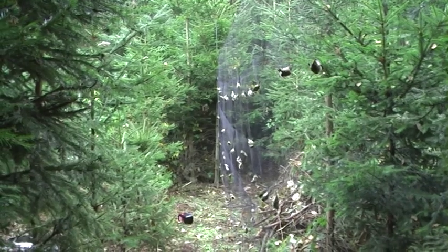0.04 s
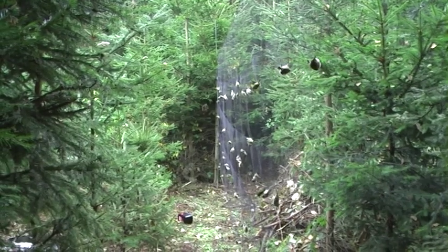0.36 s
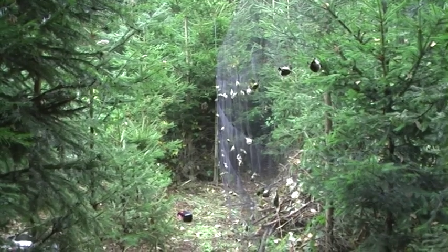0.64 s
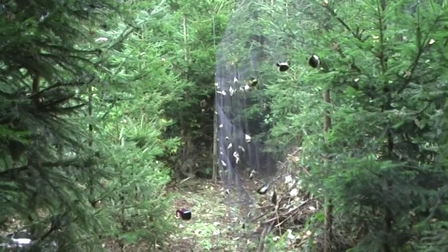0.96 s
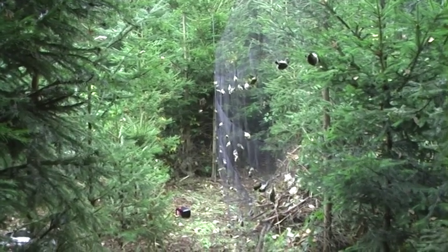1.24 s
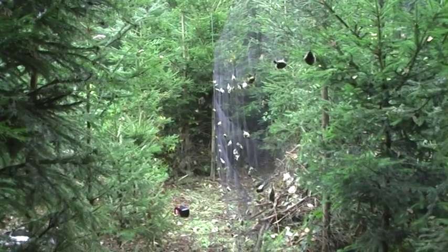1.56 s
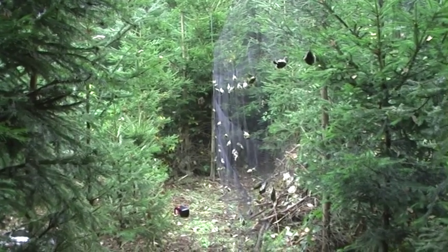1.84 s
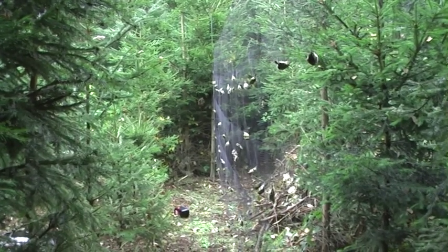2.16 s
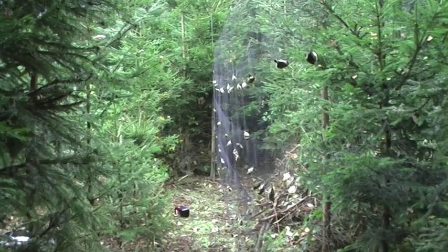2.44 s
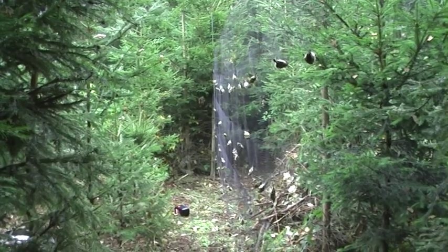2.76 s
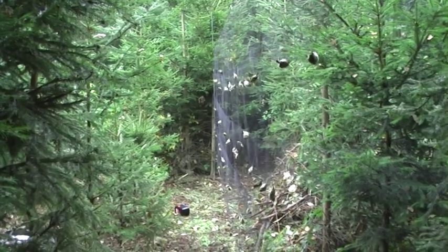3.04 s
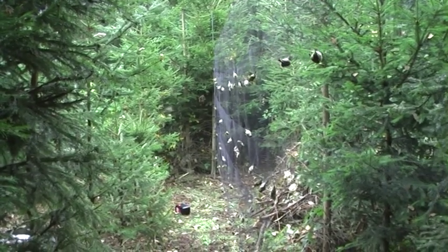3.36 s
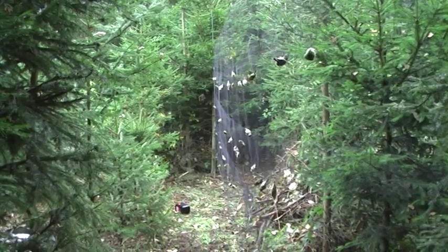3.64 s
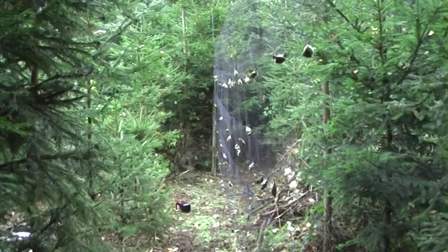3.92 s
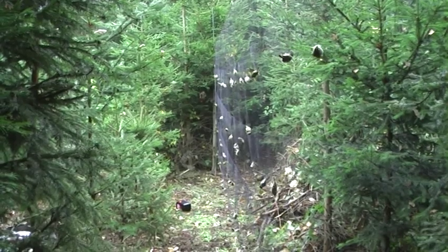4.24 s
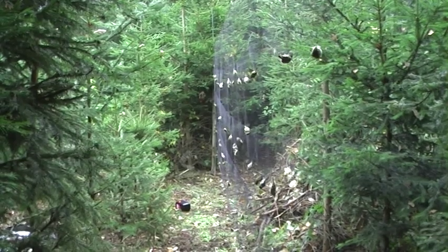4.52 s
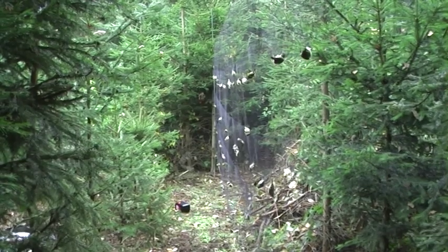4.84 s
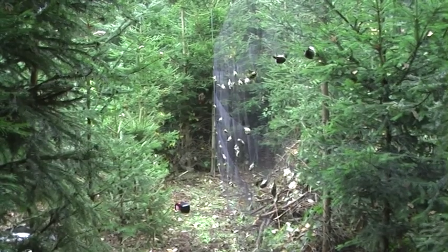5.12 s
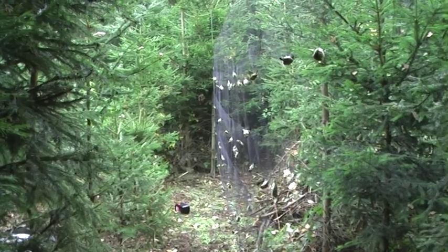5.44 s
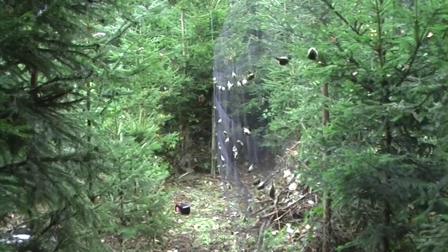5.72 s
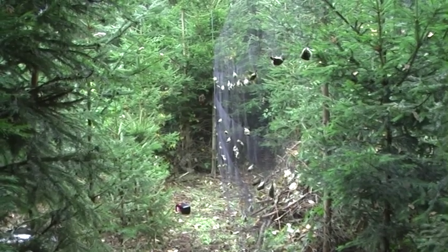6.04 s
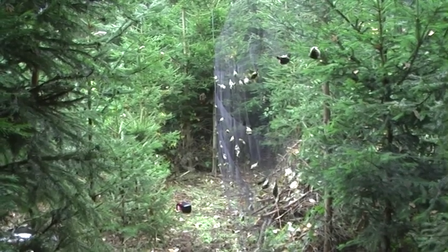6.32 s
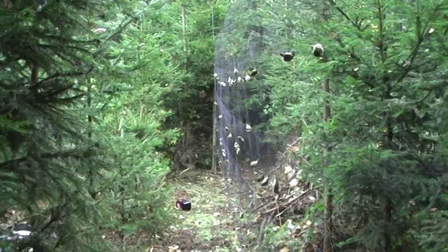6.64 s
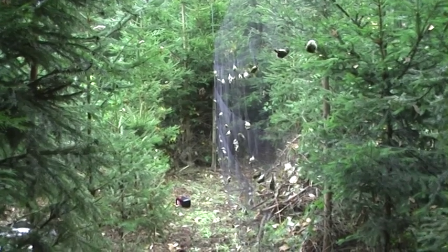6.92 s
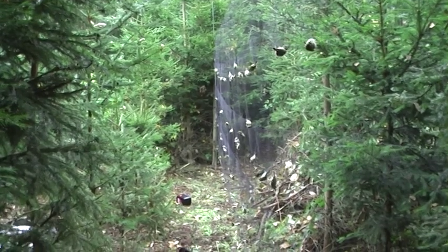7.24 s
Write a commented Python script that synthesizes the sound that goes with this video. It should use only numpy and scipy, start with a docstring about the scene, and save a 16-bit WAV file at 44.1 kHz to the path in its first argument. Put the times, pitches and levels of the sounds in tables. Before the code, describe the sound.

Thin, high-pitched birdsong comes twice, each phrase ending in a flourish, with soft treetop wind and faint twig ticks behind it.

```python
"""In a spruce wood a goldcrest sings two thin, cycling phrases, each ending in a flourish.
Its syrinx makes nearly pure tones, its throat and windpipe filter them, and trunks scatter every note.
Between the phrases come soft notes, contact calls and the blurred twitter of birds deeper in the wood.
Wind sighs in the treetops as bands of noise, a far engine drones at its firing frequency,
and needles, twigs and dry litter rustle and tick."""
import sys
import numpy as np
from scipy import signal
from scipy.fft import rfft, irfft
from scipy.io import wavfile

SR = 44100
rng = np.random.default_rng(int(sys.argv[2]) if len(sys.argv) > 2 else 0)


def waveform_to_disk(signal):
    """Save audio, clipped to [-1, 1], as 16-bit WAV at the path in sys.argv[1]."""
    frames = np.transpose(np.atleast_2d(signal))
    scaled = np.clip(frames, -1, 1) * 32767
    samples = np.round(scaled).astype(np.int16)
    wavfile.write(sys.argv[1], SR, samples)


N = 329868
TIME = np.arange(N) / SR
# Contour of a short call. Each row: share of its length, pitch offset in Hz, level in dB.
CALL_SHAPE = [(0.0, -130, -5), (0.25, -20, -1), (0.6, -54.5, -3), (1.0, -250, -3)]


def amp(db):
    """Decibels to amplitude ratio."""
    return 10 ** (np.asarray(db) / 20)


def unit(x):
    """Normalisation to rms 1."""
    return x / np.sqrt(np.mean(x ** 2) + 1e-20)


def follow(rows, at):
    """Linear interpolation of each column against the first."""
    knots, *columns = np.transpose(rows)
    return [np.interp(at, knots, column) for column in columns]


def on_log(points, hz):
    """Interpolation of a spectrum on a log-frequency axis."""
    knots_hz, value = np.transpose(points)
    return np.interp(np.log(hz + 1), np.log(knots_hz + 1), value)


def wander(n, rate_hz):
    """Random fluctuation: low-passed noise of rms about 1."""
    size = max(n, SR)
    low_pass = np.exp(-(np.fft.rfftfreq(size, 1 / SR) / rate_hz) ** 2)
    return unit(irfft(rfft(rng.standard_normal(size)) * low_pass, size))[:n]


def noise(colour):
    """Coloured stereo noise of rms 1, partly coherent between the channels."""
    # Each row: frequency in Hz, correlation of left and right.
    coherence = [(60, 0.69), (200, 0.9), (700, 0.89), (1500, 0.84), (3000, 0.5), (12000, 0.8)]
    hz = np.fft.rfftfreq(N, 1 / SR)
    left, independent = rfft(rng.standard_normal((2, N)))
    same = np.clip(on_log(coherence, hz), 0, 1)
    right = same * left + np.sqrt(1 - same ** 2) * independent
    return unit(irfft(np.array([left, right]) * amp(on_log(colour, hz)), N))


def add(mix, s, sound):
    """Superposition of a sound on the mix at time s."""
    start = round(s * SR)
    sound = sound[max(-start, 0):]
    part = mix[max(start, 0):][:len(sound)]
    part += sound[:len(part)]


def hump(s, length):
    """A half-sine envelope."""
    return np.sin(np.pi * np.clip((TIME - s) / length, 0, 1))


def syrinx(hz, db, buzz=0., buzz_hz=1000, waver_hz=25, hiss_db=-38):
    """A nearly pure whistle; amplitude modulation adds a skirt of air noise and a buzz's sidebands."""
    n = len(hz)
    t = np.arange(n) / SR
    phase = 2 * np.pi * np.cumsum(hz + waver_hz * wander(n, 270)) / SR
    edges = np.sin(np.pi / 2 * np.clip(np.minimum(t, t[-1] - t) / .002, 0, 1)) ** 2
    modulation = 1 + buzz * np.sin(2 * np.pi * buzz_hz * t) + amp(hiss_db) * wander(n, 1300)
    octave = amp(np.minimum(-63 + .0046 * (6900 - hz), 0))  # the throat passes more for low notes
    flutter_db = 1.4 * wander(n, rate_hz=90)
    return edges * modulation * amp(db + flutter_db) * (np.sin(phase) + octave * np.sin(2 * phase))


def note(shape, length, hz, db, glide_hz=0., swell_db=0., **voice):
    """Frequency modulation along one contour, stretched, shifted and tilted."""
    along = np.linspace(0, 1, round(length * SR))
    bend_hz, shape_db = follow(shape, along)
    tilt = along - .5
    return syrinx(hz + bend_hz + glide_hz * tilt, db + shape_db + swell_db * tilt, **voice)


def notes(shape, rows, **voice):
    """Superposition of notes that share a contour."""
    out = np.zeros(N)
    for s, *row in rows:
        add(out, s, note(shape, *row, **voice))
    return out


def song():
    """Four pitch contours cycle about twice a second; soft pips fall between the phrases."""
    # Each row: share of the note's length, pitch offset in Hz, level in dB.
    slur = [(0.0, -600, -15), (0.17, -170, -4.5), (0.35, -52, -2.5), (0.7, 13, 2.5), (0.87, 192.5, 1.5),
            (1.0, 239, -11.5)]
    arch = [(0, -380, -15), (.17, -140, -10), (.35, -10, -4), (.54, 0, -2), (.7, -70, -4), (.84, -230, -.5),
            (.96, -330, -2), (1, -650, -14)]
    chevron = [(0, -1150, -19), (.16, -950, -10), (.31, -110, -1), (.4, 0, 0), (.56, -650, -1),
               (.72, -950, -6), (1, -1080, -20)]
    pip = [(0.0, -260, -13.5), (0.25, -100, -8.5), (0.55, -32, -0.5), (0.85, -94, -4), (1.0, -500, -14.5)]
    # Each row: start and length in seconds, pitch in Hz, relative level in dB;
    # slurs add glide in Hz and swell in dB.
    slurs = [(0.102, 0.1, 6402, -21, -230, -1.5), (1.226, 0.034, 7150, -23.5, 250, -12),
             (4.497, 0.061, 6730, -43.5, -200, 6), (4.553, 0.065, 8470, -44, -200, -19),
             (4.949, 0.083, 6580, -30, -210, 14), (5.449, 0.094, 6415, -23, -200, -0.5),
             (5.959, 0.12, 6060, -22.5, -58, 5.5), (6.523, 0.1, 5943, -23.5, -170, 1),
             (7.185, 0.037, 7020, -28, 151, -11)]
    arches = [(0.256, 0.16, 7360, -23.5), (0.778, 0.17, 7195, -21.5), (1.013, 0.078, 7390, -19.5),
              (4.642, 0.11, 7410, -39), (5.081, 0.16, 7370, -30), (5.599, 0.138, 7353, -25.5),
              (6.119, 0.17, 7310, -25), (6.668, 0.17, 7280, -32)]
    chevrons = [(0.446, 0.055, 6500, -20), (4.789, 0.052, 6820, -30.5), (5.265, 0.048, 6570, -24.5),
                (5.775, 0.059, 6410, -22.5), (6.323, 0.046, 6485, -17)]
    pips = [(0.0, 0.059, 7140, -20.5), (0.529, 0.059, 7080, -21.5), (1.666, 0.087, 7170, -55.5),
            (1.91, 0.069, 7000, -57.5), (2.022, 0.071, 6950, -57), (2.263, 0.1, 7600, -49.5),
            (2.451, 0.109, 7430, -56), (4.87, 0.018, 7210, -27.5), (5.345, 0.063, 7150, -28.5),
            (5.861, 0.059, 7080, -27.5), (6.409, 0.063, 6900, -26)]
    return notes(slur, slurs) + notes(arch, arches) + notes(chevron, chevrons) + notes(pip, pips)


def wood(x, near_db=-13, near_t60=.24, far_db=-22.3, far_t60=.72):
    """Reverberation: a trunk reflects, near branches scatter densely, far trees leave a longer tail."""
    # Each row: delay in seconds, level in dB.
    trunk_echoes = [(.0088, -9.5)]
    t = np.arange(SR) / SR
    common, left, right = rng.standard_normal((3, SR)) * (t > .005)
    scatter = common + .8 * np.array([left, right])
    near = scatter * amp(-60 * t / near_t60)
    far = scatter[:, ::-1] * amp(-60 * t / far_t60) * (t > .01)
    response = amp(near_db) * near / np.linalg.norm(near[0]) + amp(far_db) * far / np.linalg.norm(far[0])
    response[:, 0] += 1  # direct sound
    for delay, db in trunk_echoes:
        response[:, round(delay * SR)] += amp(db)
    return signal.fftconvolve(x[None], response, axes=1)[:, :N]


def flock(flicker_db=3.5, fade_s=.18):
    """Scattering blurs far twitter into a flickering band of noise."""
    # Each row: frequency in Hz, spectral level in dB.
    band = [(5000, -46.5), (6000, -18), (7200, -14), (7700, -7), (8400, 0), (8800, -9), (9500, -30)]
    # Each row: start and length in seconds, level in dB.
    bouts = [(-0.3, 2.4, -65.5), (2.25, 1.25, -63.5), (4.3, 3.5, -63.5)]
    envelope = sum(amp(db) * np.clip(np.minimum(TIME - s, s + length - TIME) / fade_s, 0, 1)
                   for s, length, db in bouts)
    return noise(band) * envelope * amp(flicker_db * wander(N, 25))


def wind(air_db=-58, flicker_db=.5):
    """Gusts add in power to a deep and a bright sigh of the treetops, over still air."""
    # Each row: frequency in Hz, spectral level in dB.
    deep_colour = [(100, -22.5), (300, -9.5), (550, -1), (800, 2), (980, -2), (1600, -24.5), (3000, -35.5)]
    bright_colour = [(500, -28.5), (900, -3.5), (1300, 3), (1600, 0), (2100, -6.5), (2900, -21),
                     (6000, -41.5)]
    air_colour = [(22, -43), (37, -34), (51, -10.5), (65, -3), (82, -9.5), (97, -10), (208, -8), (457, -7),
                  (698, -13), (3500, -25.5), (4550, -65), (7700, -120)]
    # Each row: peak time and half width in seconds, deep and bright level in dB.
    gusts = [(0.0, 1, -50, -54), (1.353, 0.32, -55.5, -58), (2.2, 0.64, -56, -54), (2.38, 0.09, -68, -54.5),
             (3.2, 0.45, -54.5, -57), (3.649, 0.41, -67.5, -57)]
    deep, bright = amp(-62.5), amp(-65.5)  # the calm between gusts
    for s, width, deep_db, bright_db in gusts:
        bell = np.exp(-((TIME - s) / width) ** 2 / 2)
        deep = np.hypot(deep, amp(deep_db) * bell)
        bright = np.hypot(bright, amp(bright_db) * bell)
    sigh = noise(deep_colour) * deep + noise(bright_colour) * bright
    lean_left = amp([[.8], [-.8]])
    return (sigh * amp(flicker_db * wander(N, 9.5)) + noise(air_colour) * amp(air_db)) * lean_left


def engine(firing_hz=71, nearest_db=-59, nearest_s=2.5, approach_s=1, recede_s=2.5):
    """A far engine's firing tone falls off inversely with distance, beside a faint steady whirr."""
    distance = np.hypot(1, (TIME - nearest_s) / np.where(TIME < nearest_s, approach_s, recede_s))
    phase = 2 * np.pi * np.cumsum(firing_hz + .26 * wander(N, 2.2)) / SR
    firing = amp(nearest_db - 2 * wander(N, 6)) / distance * np.sin(phase)
    whirr = amp(-79) * np.sin(2 * np.pi * 143 * TIME)
    return np.sqrt(2) * (firing + whirr)


def snaps(rows, colour, t60):
    """Transients: bursts of coloured noise that decay exponentially."""
    envelope = np.zeros(N)
    decay = amp(-60 * np.arange(SR // 10) / SR / t60)
    for s, db in rows:
        add(envelope, s, amp(db) * decay)
    return envelope * noise(colour)


def needles(impulses_per_s=110, t60=.017):
    """Random impulses roughen the hiss of dry needles, which grows as branches stir; a few snap."""
    # Each row: frequency in Hz, spectral level in dB.
    colour = [(1000, -15), (2500, 1.5), (4500, 9.5), (8000, 9.5), (11000, 3.5), (14000, -10), (16000, -25)]
    # Each row: start and length in seconds, level in dB.
    stirs = [(0.057, 0.95, -62.5), (2.746, 0.22, -68), (4.496, 3.6, -68.5)]
    # Each row: start in seconds, peak level in dB.
    crisp_snaps = [(1.653, -54.5), (2.31, -51.5), (2.448, -58), (2.591, -55.5), (2.932, -49.5),
                   (2.987, -54), (3.304, -53.5)]
    decay = amp(-60 * np.arange(SR // 10) / SR / t60)
    impulses = np.minimum(rng.exponential(1, N), 2.6) * (rng.random(N) < impulses_per_s / SR)
    patches = amp(-3 + np.tanh(wander(N, 7)))
    crackle = unit(signal.oaconvolve(impulses, decay)[:N]) * patches
    stir = sum(amp(db) * hump(s, length) for s, length, db in stirs)
    hiss = noise(colour) * np.hypot(amp(-68.5), stir)
    return hiss * np.hypot(1, crackle) + snaps(crisp_snaps, colour, t60)


def twigs():
    """Twigs tick in quickly damped broadband bursts."""
    # Each row: start in seconds, peak level in dB.
    ticks = [(0.15, -46.5), (0.189, -44.5), (0.3258, -49.5), (0.425, -45.5), (0.65, -45.5), (0.971, -49.5),
             (1.711, -44.5)]
    # Each row: frequency in Hz, spectral level in dB.
    colour = [(300, -12), (1500, 1), (3500, 1), (8000, -3.5), (12000, -12.5), (16000, -17)]
    return snaps(ticks, colour, t60=.041)


def contact_calls():
    """Brief, faint whistles that glide in frequency."""
    # Each row: start and length in seconds, pitch in Hz, relative level in dB, glide in Hz.
    calls = [(0.543, 0.039, 8520, -41, 808), (1.62, 0.047, 5980, -58, -1300),
             (1.988, 0.014, 8850, -55.5, -510), (2.668, 0.044, 8430, -55.5, -650),
             (2.888, 0.012, 7980, -46.5, 318), (2.927, 0.019, 7610, -50.5, 212),
             (3.067, 0.023, 7960, -37, 202.5), (3.184, 0.065, 6060, -57, 100),
             (3.295, 0.013, 8280, -37.5, 289), (3.311, 0.092, 5880, -57, 852),
             (3.354, 0.042, 8550, -39.5, -600), (3.94, 0.035, 8160, -44.5, -260),
             (6.923, 0.07, 5350, -60, -600), (4.265, 0.016, 8060, -35, 148),
             (4.597, 0.029, 9400, -51, 1699), (4.692, 0.028, 9060, -47, 1705)]
    return notes(CALL_SHAPE, calls)


def glide(curve, **voice):
    """One whistle, modulated in frequency and amplitude along its own curve."""
    out = np.zeros(N)
    t = np.arange(curve[0][0], curve[-1][0], 1 / SR)
    add(out, t[0], syrinx(*follow(curve, t), **voice))
    return out


def climbing_whistle():
    """A loud tone rises slowly in frequency, then steepens and swells."""
    # Each row: time in seconds, pitch in Hz, relative level in dB.
    climb = [(0.623, 5300, -36.5), (0.645, 5580, -29.5), (0.7, 5700, -22.5), (0.709, 5940, -13.5),
             (0.731, 6190, -15.5), (0.738, 6370, -23)]
    return glide(climb)


def sweeps(harmonics=4):
    """The first flourish: windpipe resonance picks out whichever harmonic is sweeping through it."""
    # Each row: time in seconds, fundamental in Hz, level before the windpipe in dB.
    scoop = [(.995, 4400, -33), (1.002, 3900, -25), (1.01, 5700, -20), (1.013, 7200, -17)]
    long_sweep = [(1.143, 1800, -29), (1.153, 2250, -25), (1.163, 3450, -18), (1.175, 5100, -19),
                  (1.181, 6350, -11), (1.188, 6500, -13), (1.193, 6450, -26)]
    second_sweep = [(1.162, 4800, -26), (1.168, 6400, -13.5), (1.177, 7100, -22)]
    flick = [(1.258, 7700, -21), (1.262, 6100, -12), (1.264, 4700, -14), (1.27, 2800, -18)]
    # Each row: frequency in Hz, gain in dB.
    windpipe = [(1800, -45), (4400, -18), (5800, 0), (7000, 0), (8800, -16), (10000, -38), (18000, -90)]
    out = np.zeros(N)
    for curve in (scoop, long_sweep, second_sweep, flick):
        t = np.arange(curve[0][0], curve[-1][0], 1 / SR)
        hz, db = follow(curve, t)
        phase = 2 * np.pi * np.cumsum(hz) / SR
        tone = sum(amp(on_log(windpipe, k * hz)) * np.sin(k * phase) for k in range(1, harmonics + 1))
        add(out, t[0], amp(db) * tone * signal.windows.tukey(len(t), .1))
    return out


def swells(rows, flicker_db):
    """Band-limited noises rise and fade under random amplitude modulation."""
    out = np.zeros((2, N))
    hz = np.geomspace(50, SR / 2, 600)
    for s, length, centre_hz, octaves, db in rows:
        band_db = np.maximum(-6 * (np.log2(hz / centre_hz) / octaves) ** 2, -80)
        out += amp(db) * noise(np.c_[hz, band_db]) * hump(s, length)
    return out * amp(flicker_db * wander(N, 25))


def far_calls():
    """Distant calls and songs arrive as reverberation alone."""
    # Each row: start and length in seconds, centre in Hz, width in octaves, level in dB.
    calls = [(1.876, 0.11, 8100, 0.064, -59), (2.24, 0.12, 8020, 0.067, -57),
             (2.9, 0.16, 7800, 0.082, -61.5), (4.12, 1.44, 6000, 0.25, -60.5),
             (4.44, 0.55, 8260, 0.06, -55), (4.45, 1.2, 3220, 0.2, -69), ]
    return swells(calls, flicker_db=3)


def throat(x):
    """A band-pass filter: the throat favours the middle of the bird's range."""
    # Each row: frequency in Hz, gain in dB.
    response = [(2500, -9), (4500, -3), (6000, 0), (7900, 0), (9300, -8), (10500, -24), (14000, -30)]
    return irfft(rfft(x) * amp(on_log(response, np.fft.rfftfreq(N, 1 / SR))), N)


def click_run(start_s=3.461, gap_s=.0435, length_s=.012, hz=4700, fall_hz=3500):
    """Four faint falling chirps, so short and noisy that they are heard as clicks."""
    clicks = [(start_s + k * gap_s, length_s, hz, -52, -fall_hz) for k in range(4)]
    return notes(CALL_SHAPE, clicks, hiss_db=-6)


def litter():
    """Dry litter crunches in dull, damped bursts and shuffles once in a low band of noise."""
    # Each row: start in seconds, peak level in dB.
    crunches = [(5.27, -47), (5.663, -51.5), (6.55, -53.5), (6.722, -51), (6.758, -50.5), (6.793, -55),
                (6.835, -56), (6.843, -53)]
    # Each row: frequency in Hz, spectral level in dB.
    colour = [(150, -13), (1300, 1.5), (2500, 1), (4000, -6), (8000, -5), (14000, -23.5)]
    # Each row: start and length in seconds, centre in Hz, width in octaves, level in dB.
    shuffles = [(6.7, 0.2, 300, 2.2, -54.5)]
    return snaps(crunches, colour, t60=.083) + swells(shuffles, flicker_db=5)


def trills(first_dip=.3, sharpness=1.4):
    """Fast frequency modulation: the pitch dives from a high note in V-shaped dips."""
    # Each row: start and length in seconds, dips per second, top pitch, rise and dip depth in Hz,
    # relative level and gain in the dips in dB, roundness from 0 to 1.
    runs = [(5.285, .105, 62, 8950, 0, 800, -48, 4, .14), (6.864, .022, 82, 6900, 600, 1200, -30, 5, .4),
            (6.888, .075, 72, 7500, 150, 1050, -24, 3.5, .14),
            (7.024, .068, 64, 7650, 250, 1050, -25, 3, .14), (7.093, .06, 44, 7800, -200, 2500, -28, 5, .5)]
    out = np.zeros(N)
    for s, length, rate, top_hz, rise_hz, depth_hz, db, dip_db, roundness in runs:
        t = np.arange(round(length * SR)) / SR
        rounded_v = np.hypot(np.sin(np.pi * (rate * t - first_dip)), roundness)
        dip = np.maximum((1 - rounded_v) / (1 - roundness), 0) ** sharpness
        hz = top_hz + rise_hz * (t / length - .5) - depth_hz * dip
        add(out, s, syrinx(hz, db + dip_db * dip, waver_hz=111))
    return out


def song_ending():
    """Biphonation: both sides of the syrinx sound at once, then a buzzing squeal falls away."""
    # Each row: start and length in seconds, pitch in Hz, relative level in dB, glide in Hz.
    two_voices = [(7.219, 0.023, 6490, -22.5, -150), (7.222, 0.035, 7510, -27.5, 141)]
    # Each row: time in seconds, pitch in Hz, relative level in dB.
    squeal = [(7.267, 6450, -27), (7.27, 6400, -18), (7.277, 6280, -17), (7.283, 6080, -12),
              (7.287, 5800, -13.5), (7.291, 5600, -21), (7.298, 5150, -21), (7.305, 3600, -45),
              (7.313, 2420, -52)]
    return notes(CALL_SHAPE, two_voices, buzz=.38, buzz_hz=905) + glide(squeal, buzz=.81, buzz_hz=528.4)


def scene():
    """Superposition of all sources; sweeps, clicks and trills carry more scatter than the whistles."""
    whistles = amp(3.5) * (song() + contact_calls() + climbing_whistle()) + throat(song_ending())
    chatter = wood(sweeps() + throat(click_run() + trills()), near_db=-10, near_t60=.18)
    birds = (wood(whistles) + chatter) * amp([[.2], [-.2]])
    return birds + flock() + far_calls() + wind() + needles() + twigs() + litter() + engine()


def record(dry):
    """A hum filter's comb of narrow notches hollows the wind; a low-pass limits the band."""
    spacing_hz, width_hz, depth, edge_hz = 300, 42, .74, 15600
    for k in range(1, 18):
        hz = k * spacing_hz
        notched = signal.lfilter(*signal.iirnotch(hz, hz / width_hz, SR), dry)
        dry = dry + depth * (notched - dry)
    low_pass = signal.firwin(511, edge_hz, window=("kaiser", 9), fs=SR)
    return signal.oaconvolve(dry, low_pass[None], "same")


dry = scene()
out = record(dry)
waveform_to_disk(out)
```